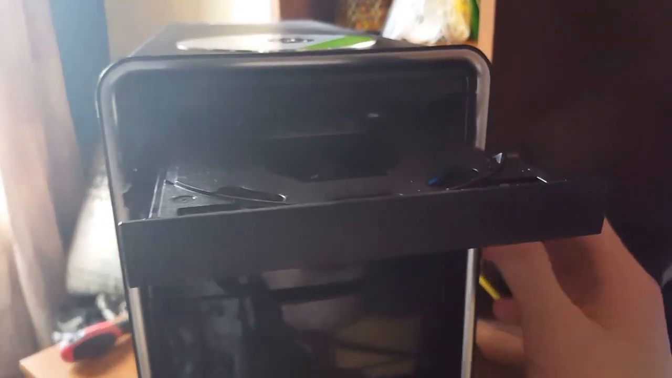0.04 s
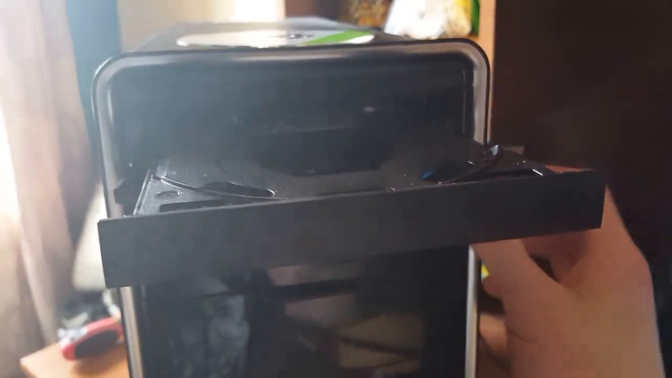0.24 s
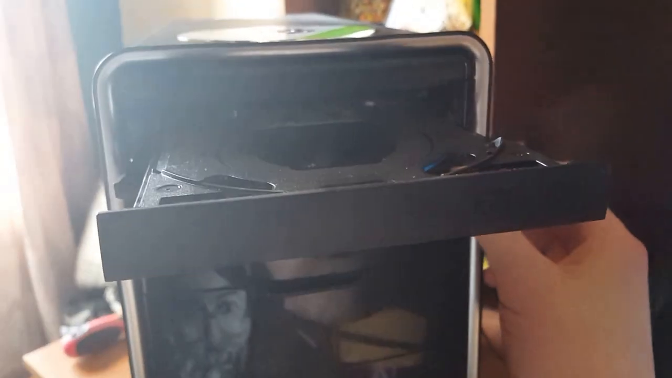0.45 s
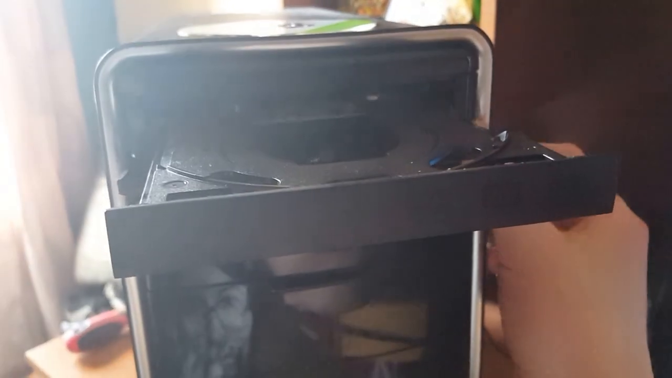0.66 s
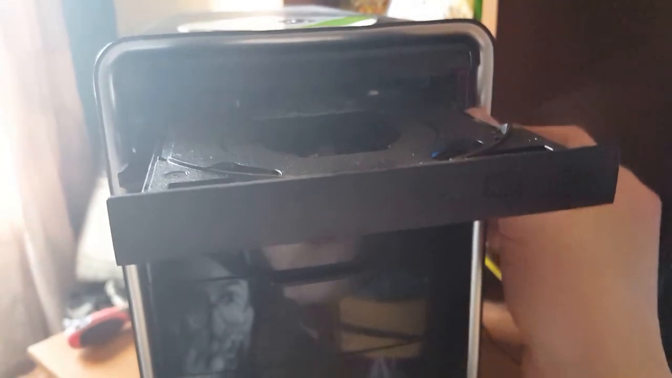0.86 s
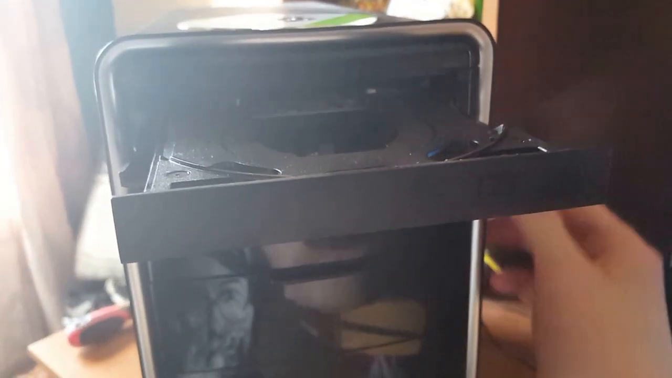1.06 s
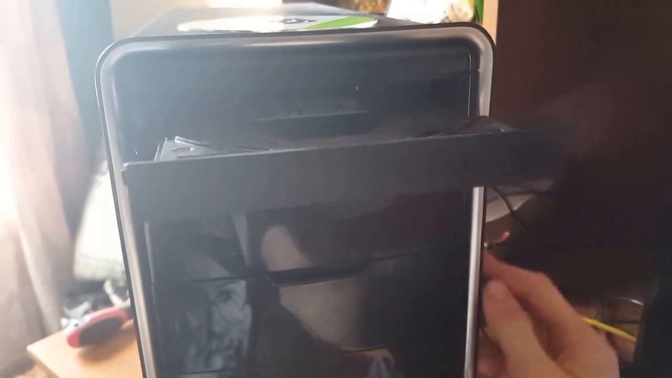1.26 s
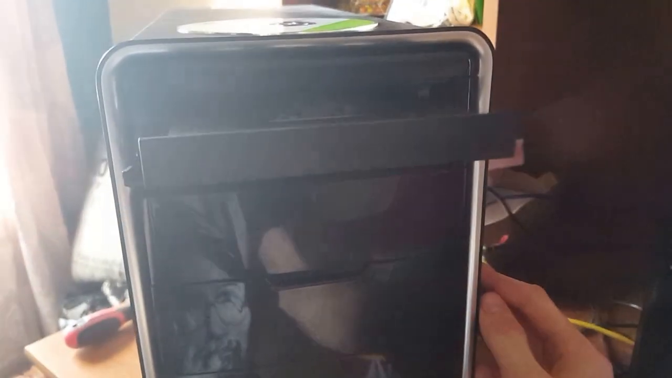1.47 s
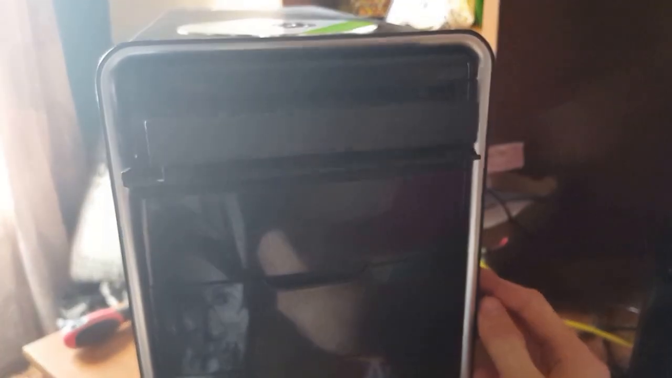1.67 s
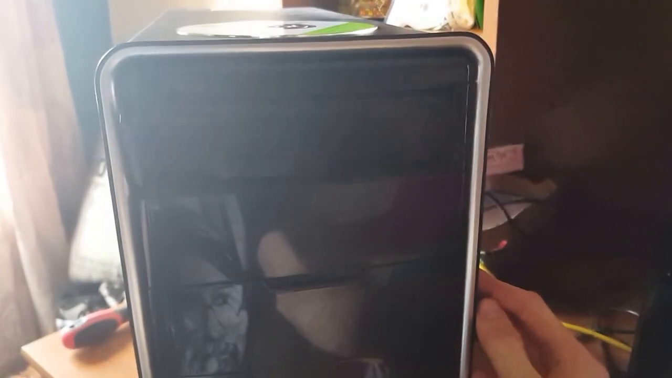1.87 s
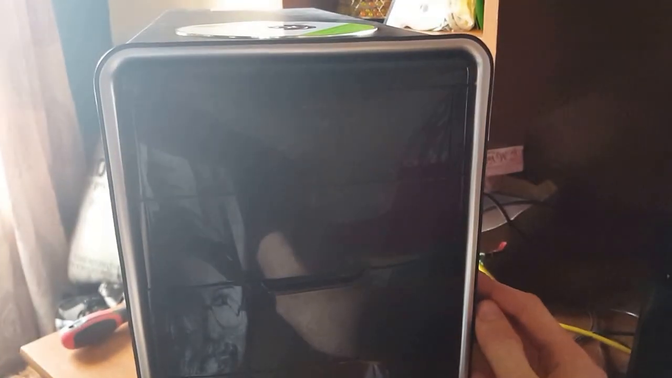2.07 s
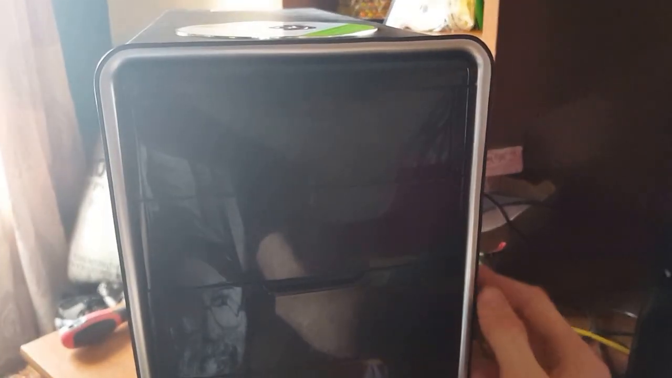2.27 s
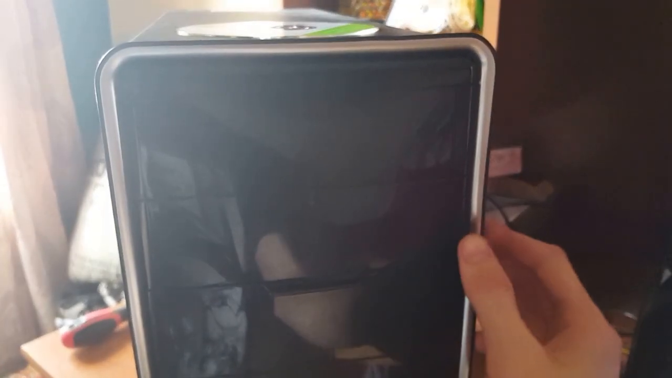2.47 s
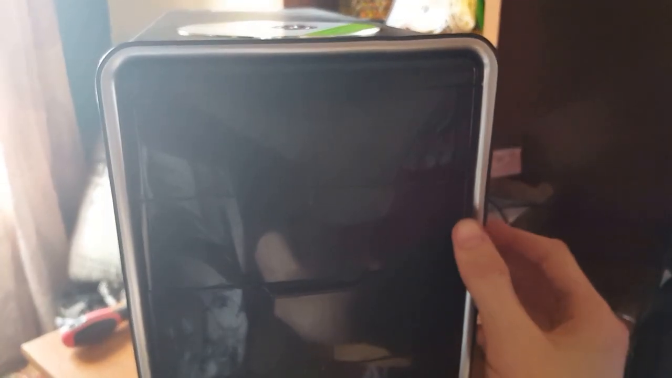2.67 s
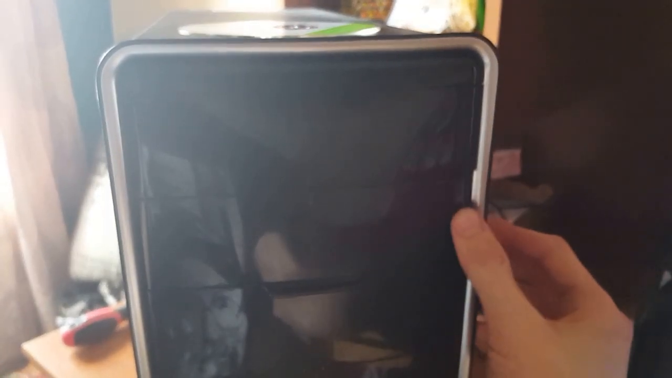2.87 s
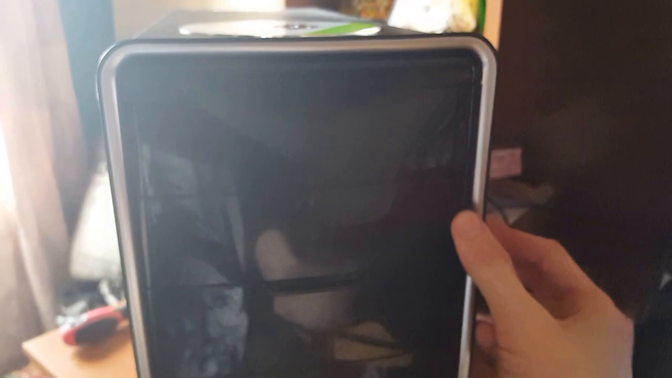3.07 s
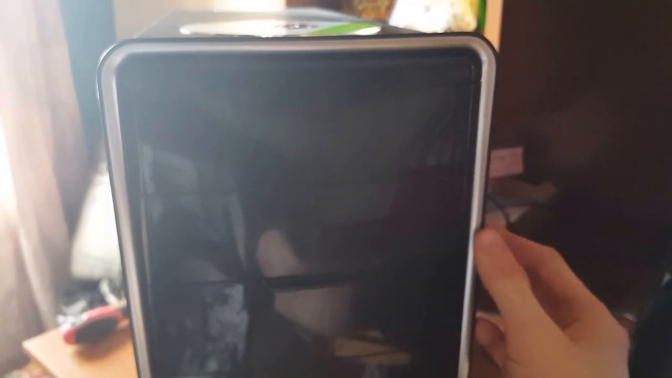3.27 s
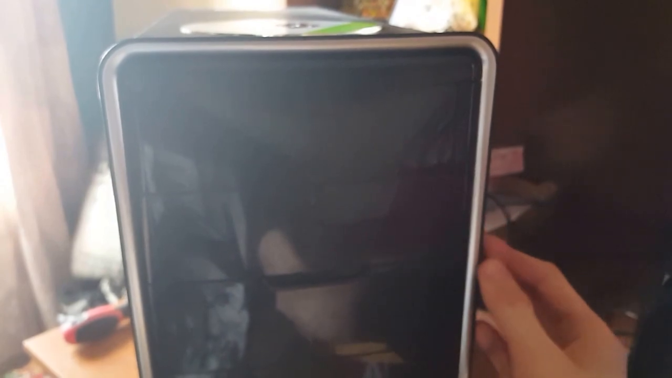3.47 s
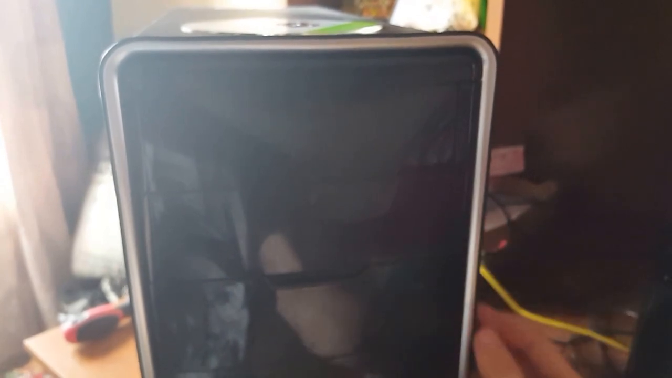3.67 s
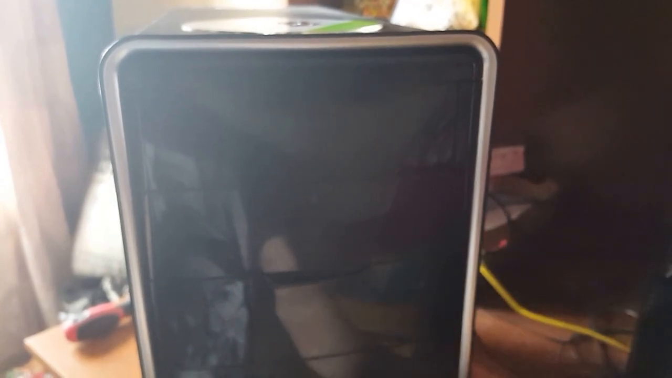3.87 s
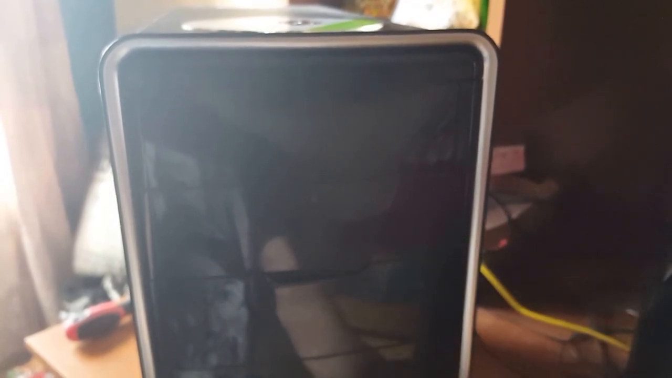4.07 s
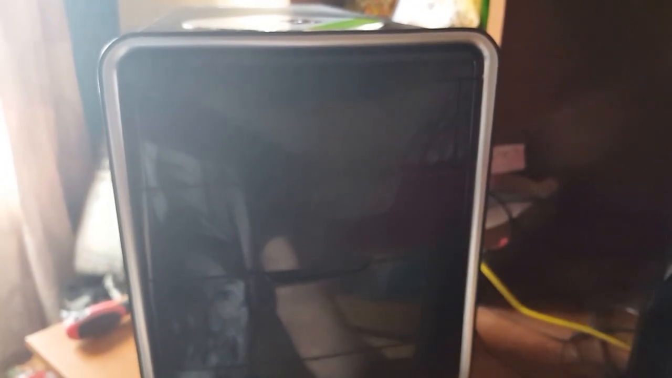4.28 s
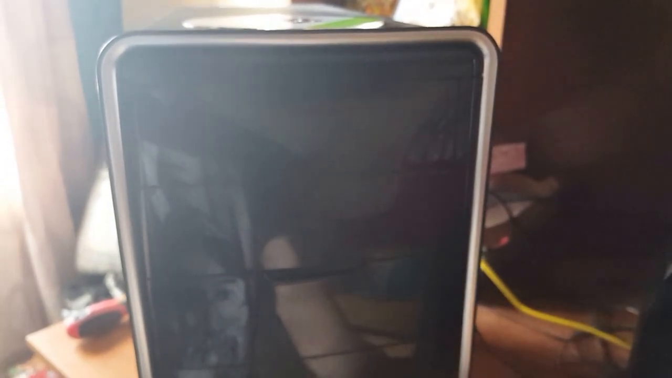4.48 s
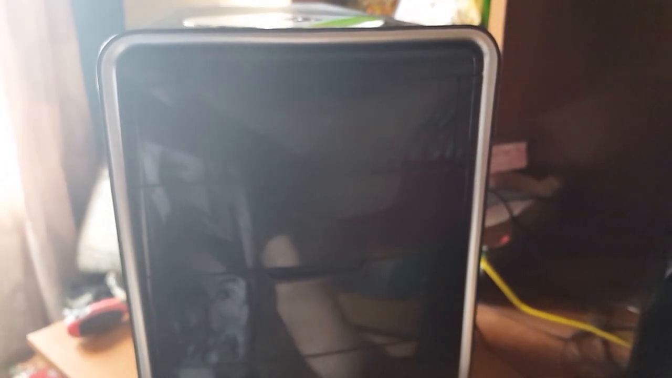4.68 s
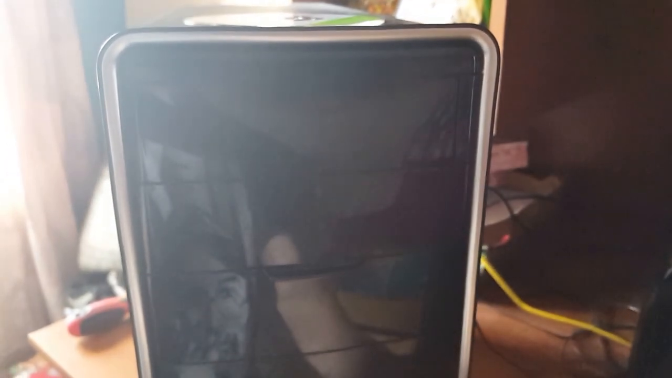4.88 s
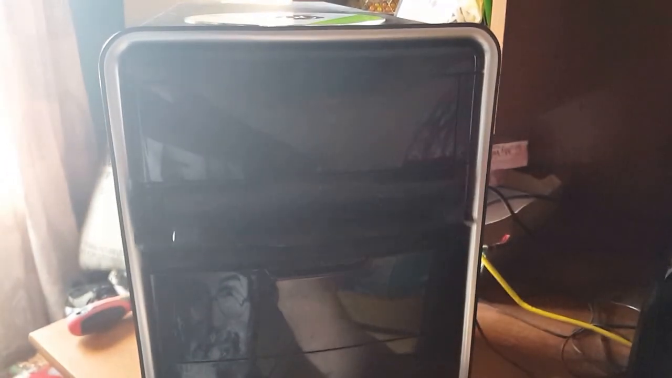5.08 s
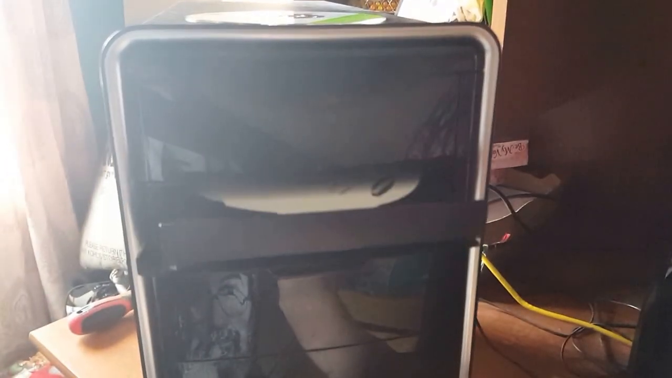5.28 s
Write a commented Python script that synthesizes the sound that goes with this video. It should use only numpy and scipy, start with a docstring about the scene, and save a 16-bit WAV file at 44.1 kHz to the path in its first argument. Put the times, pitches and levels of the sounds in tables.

```python
"""The plastic disc tray of a desktop computer, nudged by a finger, motors in on chattering gears; it
clamps and the flap drops shut. The eject button clicks, a sleeve brushes away, and the tray unlatches
and shoves the flap open again. Each contact is a snap with a short plastic ring or a dull thud, and
sets the steel case ringing. The computer hums and its fans hiss throughout, close by in a small room."""
import sys
import numpy as np
from scipy import signal
from scipy.fft import rfft, irfft
from scipy.io import wavfile

SR = 44100
rng = np.random.default_rng(int(sys.argv[2]) if len(sys.argv) > 2 else 0)


def waveform_to_disk(signal):
    """Save audio, clipped to [-1, 1], as 16-bit WAV at the path in sys.argv[1]."""
    frames = np.transpose(np.atleast_2d(signal))
    scaled = np.clip(frames, -1, 1) * 32767
    samples = np.round(scaled).astype(np.int16)
    wavfile.write(sys.argv[1], SR, samples)


N = 235229
TIME = np.arange(N) / SR

# Tone of a blow on the plastic. Each row: frequency in Hz, level in dB.
PLASTIC_TONE = [(20, -40.5), (70, -14), (130, -12), (430, -11.5), (680, -7), (850, 2), (1100, 1.5),
                (1550, 0.5), (1850, 1), (2400, 5.5), (2850, -4.5), (3800, -8.5), (5100, -3.5), (6300, -7),
                (7800, -3), (9000, -20.5), (10800, -25), (12500, -17), (15500, -21.5)]
# Clicks of tray, latch, flap and button. Each row: start in seconds, level in dB, bass trim in dB,
# treble trim in dB, ring pitch in Hz, upper ring pitch in Hz, t60 of the crack in seconds.
CONTACTS = [(0.0216, -34.5, -37, -18.5, 2130, 7600, 0.041), (0.1062, -35, -10, -21.5, 2257, 7350, 0.044),
            (0.117, -44.5, -7, -32, 1000, 7700, 0.028), (0.1877, -43.5, -9, -10.5, 1180, 3630, 0.088),
            (.195, -30.5, -13, -11.5, 1283, 8350, 0.023), (0.3625, -44, -2.5, -1.5, 1640, 8000, 0.032),
            (0.3714, -37.5, -40, -30, 2380, 6610, 0.035), (0.4502, -37, -20, -25.5, 1440, 3360, 0.084),
            (0.5791, -30.5, -11.5, -15.5, 1690, 5560, 0.055), (0.5989, -43, 0.5, -15, 960, 4150, 0.031),
            (0.694, -49.5, -25, -16, 2060, 5250, 0.06), (0.7654, -42, -26, -20, 1500, 3040, 0.014),
            (0.8102, -21.5, -21, -16, 1549, 7700, 0.035), (0.9617, -44, -8, -21, 2120, 4960, 0.053),
            (0.9685, -30.5, -7.5, -16, 1530, 4800, 0.047), (.9914, -43.5, 2.5, -7, 1490, 5070, 0.019),
            (1.0283, -29.5, -22, -12, 1540, 5730, 0.053), (1.0408, -31, -12.5, -20, 1060, 5440, 0.037),
            (1.1772, -35.5, -2, -15, 2030, 7500, 0.025), (1.3763, -45, -15, -7, 1170, 4130, 0.022),
            (1.4222, -35.5, -18, -25, 1560, 4170, 0.023), (1.4507, -32, -2, -14, 2240, 7500, 0.049),
            (1.5653, -29.5, -32, -22, 2310, 5070, 0.03), (1.584, -28.5, -12, -17, 1920, 4330, 0.046),
            (1.765, -23, -14, -10.5, 2174, 6840, 0.015), (1.7853, -28, -25, -4, 1280, 3200, 0.026),
            (1.8107, -34, 5, -16, 910, 4810, .028), (1.8412, -38, 4, -9.5, 1180, 4370, .035),
            (1.8872, -43, -9.5, -0.5, 1270, 8400, 0.014), (1.9046, -42, -16, -2.5, 2240, 7900, 0.022),
            (1.9989, -26.5, -11, -15, 2460, 5130, 0.016), (2.0205, -8.5, -37, -16.5, 1910, 5170, 0.027),
            (2.0233, -19.5, -3.5, -1.5, 1550, 8100, 0.018), (2.1371, -19, -9.5, -32, 1287, 5030, 0.0037),
            (2.1445, -14.5, -11, -19, 1696, 7530, 0.017), (2.1665, -23, -6, -9, 1153, 5800, 0.0097),
            (2.3532, -47, -14, -20, 2010, 7200, 0.046), (2.7412, -44.5, -14.5, -16.5, 2090, 5040, 0.03),
            (2.9229, -23.5, -24, -20.5, 2187, 7360, 0.019), (2.9303, -25.5, -17, -18, 1040, 5680, 0.024),
            (2.9434, -39, -10, -21, 940, 7300, 0.024), (3.1013, -38.5, -2.5, -25, 1090, 4800, 0.048),
            (3.182, -38, -5, -17, 1575, 5650, 0.061), (4.7742, -49, -1.5, -25, 1870, 5076, 0.099),
            (4.862, -34, -1, -39, 1610, 7800, 0.014), (4.8829, -32, -1, -33, 1520, 3140, 0.016),
            (4.9099, -32.5, 3.5, -21, 1410, 3080, 0.084), (4.9721, -28, -8, -34, 1640, 3050, 0.022),
            (4.998, -21.5, -8.5, -20, 1320, 3560, 0.047), (5.0349, -35, 0.5, -29, 1320, 3000, .038),
            (5.0886, -34, -4.5, -19, 1260, 4070, 0.054), (5.1588, -33.5, -2.5, -12.5, 2420, 7850, 0.053),
            (5.2124, -36, -17, -16.5, 2255, 3800, 0.062), (5.2591, -23, -23, -18.5, 2290, 7750, 0.024),
            (5.2797, -14.5, -55, -14, 2125, 4300, 0.042), (5.2999, -29.5, -28, -5, 2410, 7750, 0.056),
            (5.3082, -26.5, -46, -10.5, 2370, 4100, 0.15)]
def click(level_db, bass_db, treble_db, ring_hz, upper_hz, crack_t60, size=8192):
    """Plastic is struck: a snap and a crack, then a short dense ring with the part's own pitches in it."""
    rise_s, lean_left_db = 0.001069, 0.6
    t = np.arange(size) / SR
    hz, noise = stereo_noise(size)
    # Heavy, low-pitched parts knock more hollowly; harder blows reach higher.
    knock_db = -6.5 + 0.16 * bass_db - 2.5 * np.log2(ring_hz / 1626)
    hardness_db = .25 * (level_db + 28.5) / (1 + (9000 / (hz + 1)) ** 8)
    part_db = 7 / (1 + ((hz - upper_hz) / 260) ** 2) + 3 / (1 + ((hz - ring_hz) / 120) ** 2)
    colour = amp(curve(PLASTIC_TONE, hz) + hardness_db + part_db) * facing(hz, lean_left_db)
    bass, knock, middle, treble = bands(noise * colour, hz, size, (670, 1400, 3300))
    crack = fade(t, crack_t60)
    sound = amp(-4.5) * middle * np.hypot(crack, amp(-11.5) * fade(t, 0.12))
    sound += amp(knock_db - 6) * knock * np.hypot(crack, amp(-3.5) * fade(t, 0.14))
    sound += amp(treble_db + 6) * treble * np.hypot(crack, amp(-13) * fade(t, 0.071))
    panel_rise = 1 - np.exp(-t / 0.00089)  # panels take a moment to move
    sound += amp(bass_db - 9) * bass * fade(t, 0.094) * panel_rise
    ring = np.sin(2 * np.pi * ring_hz * t) * fade(t, .045)
    sound += amp(-10.5) * ring * facing(np.array([ring_hz]), lean_left_db)
    sound *= 1 - np.exp(-t / rise_s)
    tilt_db = curve([(400, bass_db + 2.5), (1000, knock_db + 8), (2000, 0.012),
                     (5000, treble_db + 5.5)], hz)
    snap_db = -8 + 0.65 * min(level_db + 16.5, 10)  # light touches barely snap
    add(sound, rise_s, amp(snap_db) * snap(colour * amp(tilt_db), size))
    return amp(level_db) * sound


def snap(spectrum, size):
    """The instant of contact: the tightest causal pulse with this stereo spectrum, peak one."""
    cepstrum = irfft(np.log(spectrum + 1e-5), size)
    cepstrum[:, 1:size // 2] *= 2
    cepstrum[:, size // 2 + 1:] = 0
    pulse = irfft(np.exp(rfft(cepstrum)), size)
    return pulse / abs(pulse).max()


# Soft thuds of tray and case. Each row: start in seconds, level in dB, pitch in Hz, t60 in seconds.
THUDS = [(0.034, -53.5, 218, 0.31), (.122, -53.5, 222, 0.4), (0.874, -40, 330, 0.017),
         (0.88, -49, 120, .093), (1.072, -42.5, 183, .055), (2.024, -26, 254, 0.022),
         (2.146, -30, 437.5, 0.074), (2.171, -49, 90, 0.33), (2.195, -46, 356, 0.13),
         (3.1, -50.5, 287, 0.051)]
def thud(level_db, pitch_hz, t60, size=16384):
    """One damped panel swing with a blur of others round it."""
    t = np.arange(size) / SR
    hz, noise = stereo_noise(size)
    blur = unit(irfft(noise * np.exp(-(np.log2((hz + 1) / pitch_hz) / 0.55) ** 2), size))
    body = np.sin(2 * np.pi * pitch_hz * t) + amp(3.5) * blur
    return amp(level_db) * body * fade(t, t60) * (1 - np.exp(-t / 0.00079))


# Load on the gears, one list per move: nudge, in, out. Each row: time in seconds, level in dB.
TRAY_MOVES = [
    [(.03, -54), (.1, -65), (.3, -79)],
    [(1.17, -51), (1.27, -52), (1.47, -44), (1.59, -45), (1.64, -51.5), (1.75, -53), (1.79, -36.5),
     (1.91, -47.5), (2.02, -60)],
    [(4.84, -54), (4.93, -51), (5.03, -48.5), (5.13, -54), (5.25, -46), (5.333, -38)],
]
def gear_load():
    """Gain of the gear noise over time; silent while the tray rests."""
    load = np.zeros(N)
    for move in TRAY_MOVES:
        start, end = move[0][0], move[-1][0]
        gate = np.interp(TIME, [start - .01, start + .01, end, end + .03], [0, 1, 1, 0])
        load += fader(move) * gate
    return load


# Tone of the running mechanism. Each row: frequency in Hz, level in dB.
GEAR_TONE = [(20, -40), (70, -6), (170, 5), (600, 6.5), (850, -9.5), (1050, -5.5), (1250, 5.5),
             (1400, -6.5), (1530, -7), (1750, -7.5), (2350, 1.5), (3400, -15), (4200, -5), (4550, -11.5),
             (5100, -6.5), (6000, -17.5), (7800, -8.5), (9300, -31.5), (15000, -29.5)]
def tray_travel(teeth_hz=61.8, slips_per_s=260):
    """Gear teeth chatter and the runners scrape in tiny slips while the tray travels."""
    hz, noise = stereo_noise(N)
    rumble, rattle, scrape = bands(noise * amp(curve(GEAR_TONE, hz)) * facing(hz), hz, N, (670, 3300))
    teeth_passed = np.cumsum(teeth_hz * (1 + 0.087 * drift(51))) / SR
    teeth = 1 + 0.21 * np.exp(-(teeth_passed % 1) / 0.29)
    slips = (rng.random(N) < slips_per_s / SR) * np.minimum(rng.exponential(1, N), 2)
    slips = signal.lfilter([1], [1, -np.exp(-1 / (0.0014 * SR))], slips)  # each slip dies in a moment
    rumble *= amp(-4) * unit(teeth)
    rattle *= unit(teeth + 0.65 * slips)
    scrape *= amp(-8.5) * unit(teeth + 1.2 * slips)
    return amp(-2.5) * gear_load() * (rattle + rumble + scrape)


def gear_catches(per_s=22, low_hz=1100, high_hz=2300):
    """The gears catch with small clicks at uneven moments, harder under more load."""
    catches, load = np.zeros((2, N)), gear_load()
    for slot, (when, strength, pitch) in enumerate(rng.random((128, 3))):
        start = (slot + when) / per_s
        gain = np.interp(start, TIME, load, right=0)
        if gain > 0:
            level_db = 20 * np.log10(gain) + 7.5 + 2.5 * (2 * strength - 1)
            ring_hz = low_hz + pitch * (high_hz - low_hz)
            tick = click(level_db, bass_db=-8, treble_db=-12.5, ring_hz=ring_hz,
                         upper_hz=4200, crack_t60=.018)
            add(catches, start, tick)
    return catches


# Resonances of the steel case. Each row: pitch in Hz, gain in dB, t60 in seconds.
CASE_MODES = [(278, -2, .3), (377, -1, .38), (445, 1.5, .17), (598, -5.5, .16), (801, -2, .2),
              (888, -2, .13), (1010, 1, .2), (1275, -1, .17), (1520, 1, .09), (1610, 1.5, .12),
              (2050, -4, .13), (2181, -2, .16), (2261, -3, .11), (2455, -3, .16), (4565, -4, .1),
              (5060, -2, .14), (7690, -3, .09)]
def steel_case(drive, low_cut_hz=65):
    """The drive sets the panels ringing; they are too small to radiate the deepest bass."""
    t = np.arange(SR // 2) / SR
    ring = sum(2 * amp(db) * np.cos(2 * np.pi * hz * t) * fade(t, t60) / fade(t, t60).sum()
               for hz, db, t60 in CASE_MODES)
    ringing = drive + signal.oaconvolve(drive, ring[None], axes=1)[:, :N]
    return signal.sosfilt(signal.butter(2, low_cut_hz, "high", fs=SR, output="sos"), ringing)


# Tone of rubbing cloth. Each row: frequency in Hz, level in dB.
CLOTH_TONE = [(250, -10), (500, -9.5), (1000, 0), (1800, 1), (2400, 3), (3000, -16), (3700, -19.5),
              (5200, -14), (6500, -21), (7700, -12.5), (9500, -42), (16000, -27)]
# Brushes of the sleeve. Each row: centre in seconds, level in dB, half length in seconds.
BRUSHES = [(2.39, -64, 0.082), (2.774, -66.5, .05), (3.36, -65, 0.037), (3.566, -64, 0.11),
           (3.669, -56.5, 0.054), (3.767, -62, 0.055), (3.928, -60, 0.14)]
def sleeve(hiss_hz=13000):
    """Cloth rubs in small uneven scuffs, with a fine high hiss as the arm draws away."""
    hz, noise = stereo_noise(N)
    strokes = sum(amp(db) * swell(centre_s, half_s) for centre_s, db, half_s in BRUSHES)
    rub, fizz = bands(noise * amp(curve(CLOTH_TONE, hz)) * facing(hz, -1.5), hz, N, (3300,))
    scuffs = rub * amp(1.3 * drift(40)) + amp(-10) * fizz * amp(2.2 * drift(25))
    hiss = unit(irfft(noise / (1 + ((hz - hiss_hz) / 600) ** 2), N))
    return strokes * scuffs + amp(-76) * swell(centre_s=3.72, half_s=.34) * hiss


# Tone of the fan air. Each row: frequency in Hz, level in dB.
FAN_TONE = [(20, -22.5), (38, -0.5), (50, -9.5), (85, -1), (160, -9.5), (240, -3), (350, -12), (650, -14),
            (880, -13.5), (1150, -16.5), (1600, -14.5), (2300, -15.5), (3200, -24), (5500, -28),
            (7100, -24), (9500, -37), (13000, -29.5), (16000, -29.5)]
# Fader rides for the fan air and the hum. Each row: time in seconds, level in dB.
FAN_RIDE = [(0, -62.5), (1.1, -62), (2.5, -63.5), (3.4, -63.5), (4.4, -65), (5.33, -60)]
HUM_RIDE = [(0, -58), (.9, -58.5), (1.6, -57), (2.4, -58.5), (3, -59), (3.7, -60), (4.4, -61),
            (5.33, -58.5)]
# Faint fan and coil whines. Each row: pitch in Hz, level in dB.
WHINE_TONES = [(240, -88), (877, -77.5), (1362, -80.5), (2724, -96), (5766, -88), (7000, -83.5),
               (11531, -97.5), (14416, -94.5)]
def computer(hum_hz=120):
    """The bed: fan air, the steady hum of the case and a few wavering whines."""
    hz, noise = stereo_noise(N)
    air = unit(irfft(noise * amp(curve(FAN_TONE, hz)), N)) * fader(FAN_RIDE)
    hum = np.sqrt(2) * fader(HUM_RIDE) * np.sin(2 * np.pi * hum_hz * TIME + 0.017 * drift(4))
    whines = sum(amp(db) * np.sin(2 * np.pi * f * TIME + 1.6 * drift(19)) for f, db in WHINE_TONES)
    return air + (hum + whines) * amp([[-.4], [.4]])  # a touch to the right


# Length of the room tail. Each row: frequency in Hz, multiplier on the base t60.
ROOM_DECAY = [(100, 0.98), (500, 0.56), (2000, 0.51), (6000, 0.74), (15000, 0.13)]
def room(sound, base_t60=0.84, predelay_s=.006):
    """Sparse reflections of a small room, each band dying at its own speed."""
    taps = rng.standard_normal((2, SR // 2)) * (rng.random((2, SR // 2)) < .1)
    taps[:, :round(predelay_s * SR)] = 0
    hz, t, (left, other) = signal.stft(taps, SR, nperseg=256)
    decay = fade(t, base_t60) ** (1 / curve(ROOM_DECAY, hz)[:, None])
    tail = signal.istft(narrow_bass(left, other, hz[:, None]) * decay, SR, nperseg=256)[1]
    return signal.fftconvolve(sound, tail / np.linalg.norm(tail[0]), axes=1)[:, :N]


# Stereo lean. Each row: frequency in Hz, left over right in dB.
STEREO_LEAN = [(100, 1), (700, -1), (1250, -0.5), (1550, 9), (2450, 7), (3200, -2.5), (4300, 0), (5100, 6),
               (6800, 1.5), (8200, 8.5), (11000, 13.5), (15000, 1)]
def facing(hz, pan_db=0):
    """Stereo gains: the left side faces the drive and gets more treble; bass bends round to both."""
    shadow = 1 / (1 + (900 / (hz + 1)) ** 4)
    return amp(np.outer([.5, -.5], curve(STEREO_LEAN, hz) + pan_db * shadow))


# Stereo narrowness. Each row: frequency in Hz, left-right correlation from 0 to 1.
CORRELATION = [(30, 0.12), (130, 0.75), (600, 0.84), (1300, 0.54), (2200, 0), (3200, 0), (16000, 0.054)]
def narrow_bass(left, other, hz):
    """Makes two unrelated spectra a stereo pair: long waves reach both sides alike."""
    same = curve(CORRELATION, hz)
    return np.array([left, same * left + np.sqrt(1 - same ** 2) * other])


def stereo_noise(size):
    """Frequencies and a random-phase stereo spectrum, wide in the treble."""
    hz = np.fft.rfftfreq(size, 1 / SR)
    left, other = np.exp(2j * np.pi * rng.random((2, len(hz))))
    return hz, narrow_bass(left, other, hz)


def bands(spectrum, hz, size, edges_hz):
    """Splits a spectrum at the edges into sounds of rms one, from bass to treble."""
    below = [0] + [1 / (1 + (hz / edge) ** 10) for edge in edges_hz] + [1]
    return [unit(irfft(spectrum * (upper - lower), size)) for lower, upper in zip(below, below[1:])]


def drift(rate_hz, count=2048):
    """Smooth random wandering."""
    hz = np.fft.rfftfreq(count, N / SR / count)
    slow = unit(irfft(rfft(rng.standard_normal(count)) * np.exp(-(hz / rate_hz) ** 2), count))
    return np.interp(TIME, np.linspace(0, N / SR, count), slow)


def swell(centre_s, half_s):
    """A smooth rise and fall."""
    return np.exp(-((TIME - centre_s) / half_s) ** 2)


def fade(t, t60):
    """Exponential decay, 60 dB down after t60 seconds."""
    return amp(-60 * t / t60)


def fader(points):
    """Gain over time from rows of seconds and dB."""
    return amp(np.interp(TIME, *np.transpose(points)))


def curve(points, hz):
    """Reads a curve on a log-frequency axis."""
    f, value = np.transpose(points)
    return np.interp(np.log(hz + 1), np.log(f), value)


def amp(db):
    """Decibels to gain."""
    return 10 ** (np.asarray(db) / 20)


def unit(x):
    """Scales to an rms of one."""
    return x / np.sqrt(np.mean(x ** 2) + 1e-20)


def add(mix, start_s, sound):
    """Mixes a stereo sound in."""
    part = mix[:, max(round(start_s * SR), 0):][:, :sound.shape[1]]
    part += sound[:, :part.shape[1]]


def scene():
    """The drive in its case and room, over the sleeve and the running computer."""
    drive = tray_travel()
    background = sleeve() + computer()
    for start, *contact in CONTACTS:
        add(drive, start, click(*contact))
    for start, *bump in THUDS:
        add(drive, start, thud(*bump))
    drive = steel_case(drive + gear_catches())
    return drive + amp(-19.5) * room(drive) + background


def record(dry):
    """A steep high cut at 16.3 kHz."""
    high_cut = signal.firwin(301, 16300, window=("kaiser", 9), fs=SR)
    return signal.oaconvolve(dry, high_cut[None], "same")


dry = scene()
out = record(dry)
waveform_to_disk(out)
```